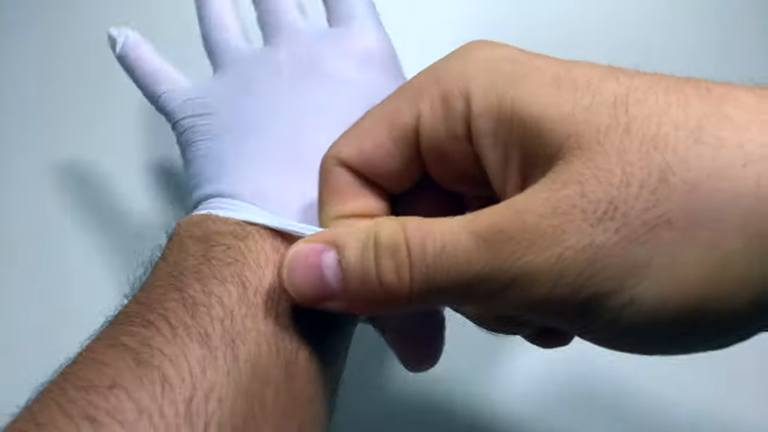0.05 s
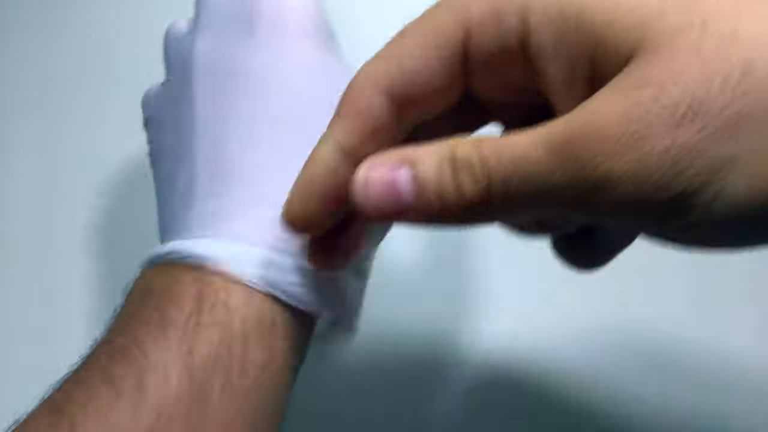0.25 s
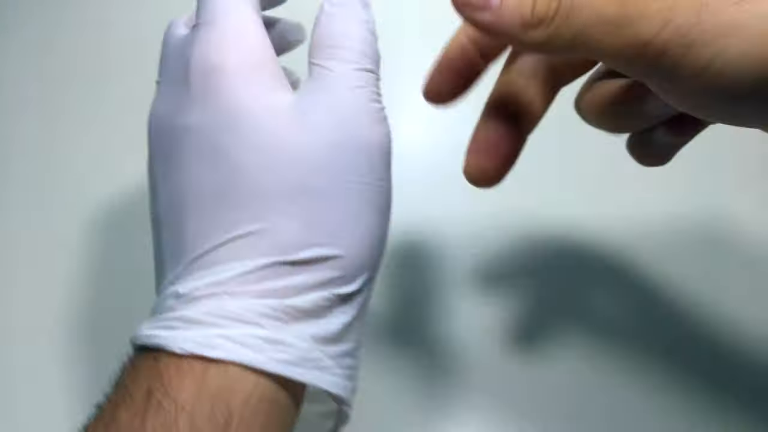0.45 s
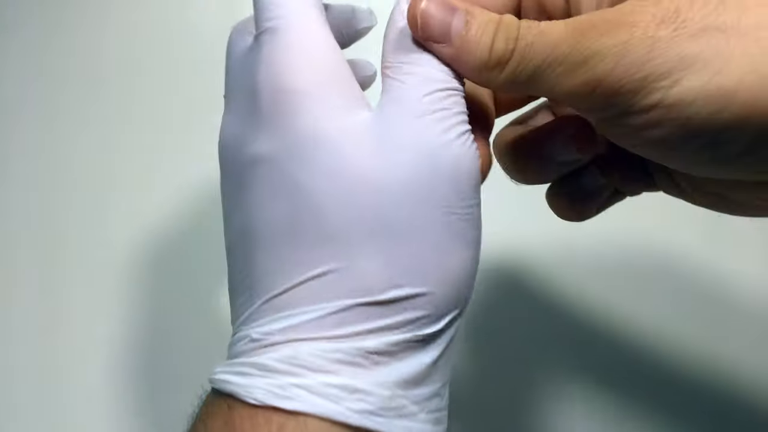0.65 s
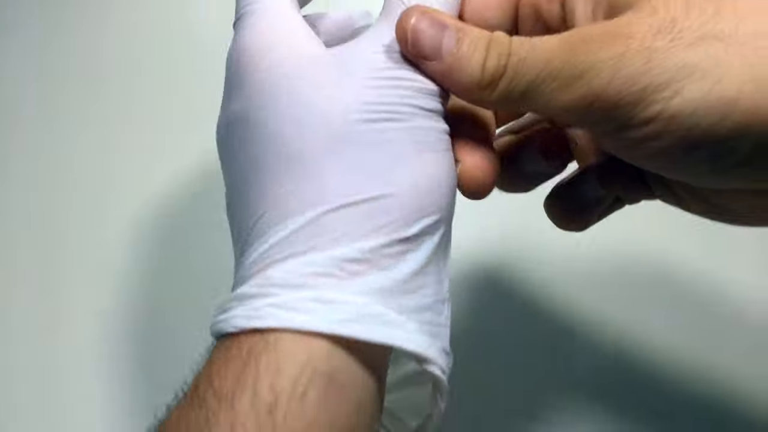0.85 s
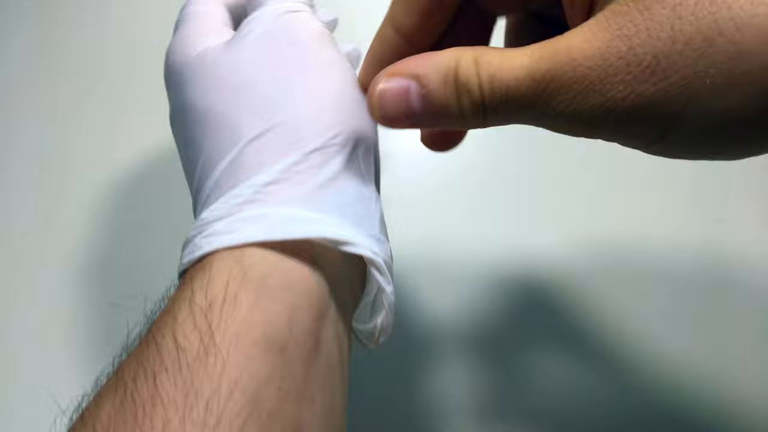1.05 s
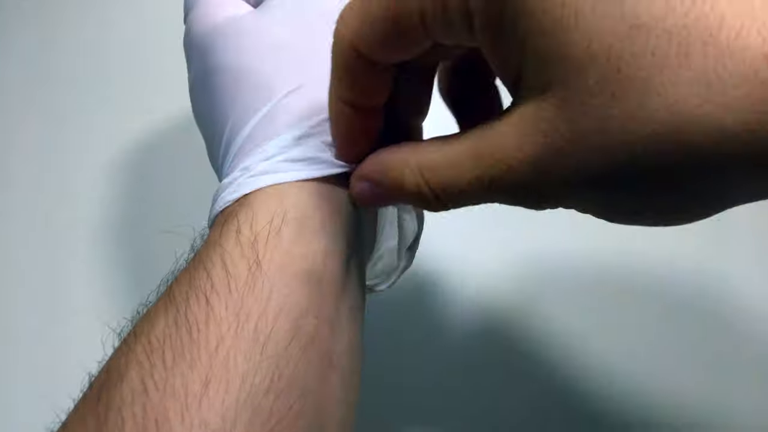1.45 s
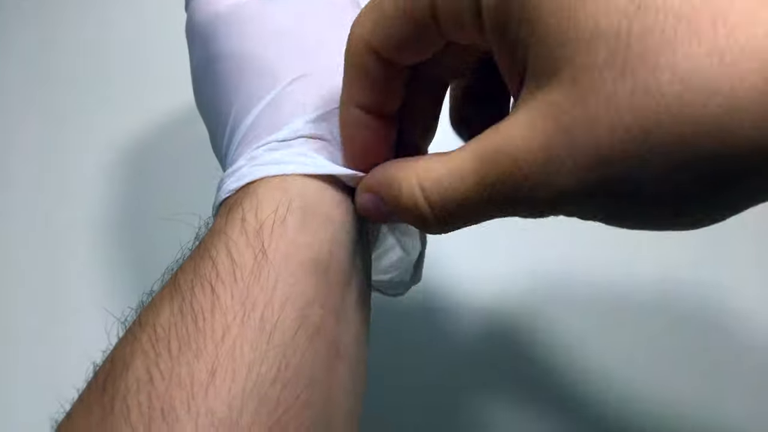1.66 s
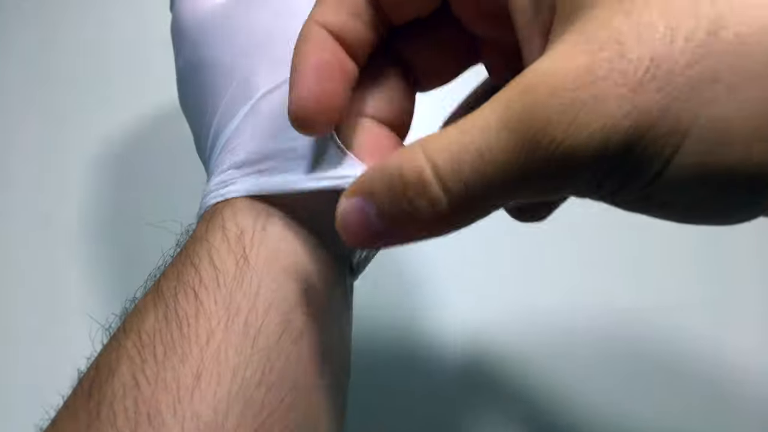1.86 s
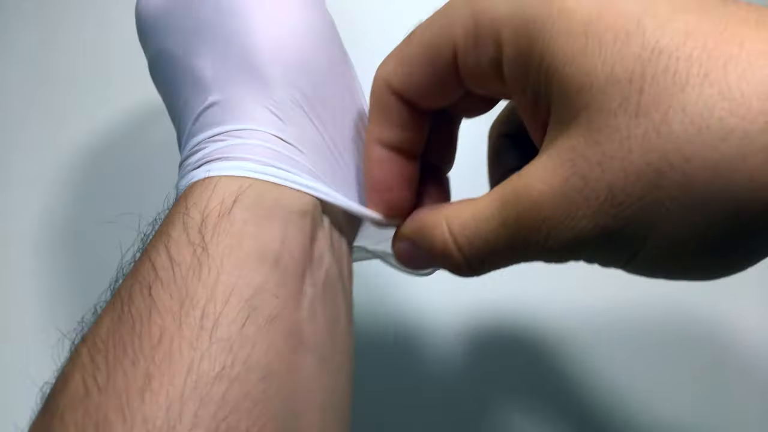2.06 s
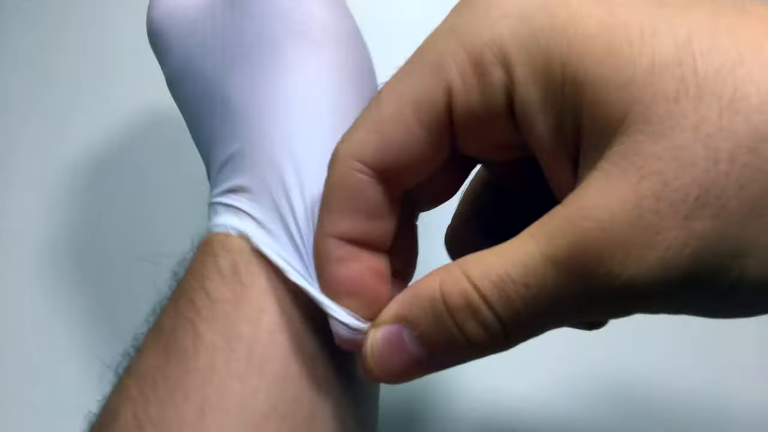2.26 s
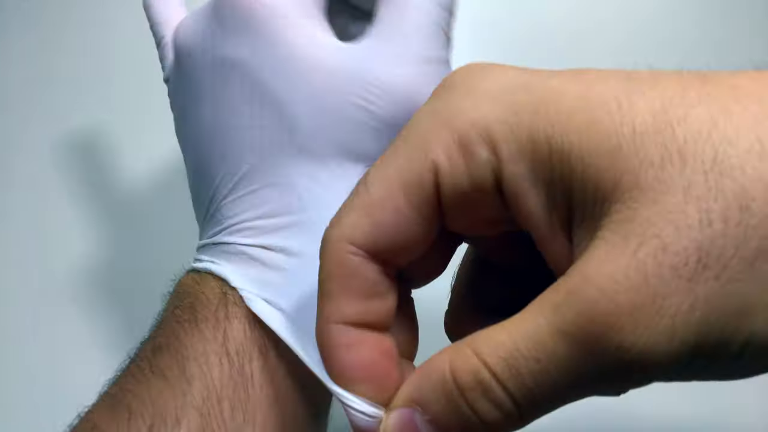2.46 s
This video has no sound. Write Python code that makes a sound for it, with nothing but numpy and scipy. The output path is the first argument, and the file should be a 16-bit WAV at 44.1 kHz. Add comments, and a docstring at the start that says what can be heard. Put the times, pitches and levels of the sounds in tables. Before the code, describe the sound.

Close up in a quiet room, a disposable glove cuff cracks against skin, and a loose fold slaps right after. Faint rustling and little clicks follow, then the rubber creaks and briefly groans as it is pulled taut.

```python
"""Faint rustles and small twangs of rubber, then the cuff of a thin glove snaps against the wrist,
close to one microphone in a small quiet room. The taut film cracks and slaps the skin; a loose fold
slaps after it. Fingers slide over the glove, take hold with a soft low boom and stretch the cuff again:
folds tick, and the rubber sticks and slips in twangs, creaks and a short groan. A low hum lies beneath."""
import sys
import numpy as np
from scipy import signal
from scipy.fft import rfft, irfft, next_fast_len
from scipy.io import wavfile
from scipy.ndimage import map_coordinates

SR = 44100
rng = np.random.default_rng(int(sys.argv[2]) if len(sys.argv) > 2 else 0)


def wrap_up_sound(samples):
    """Save the sound to the file named by the first command line argument, as 16-bit audio."""
    columns = np.atleast_2d(samples).T
    # keep every value between -1 and 1, then stretch to whole-number steps
    tamed = np.clip(columns, -1, 1)
    steps = np.round(tamed * 32767).astype(np.int16)
    wavfile.write(sys.argv[1], SR, steps)


N = 114660  # 2.6 s


def amp(db):
    """Decibels to gain."""
    return 10 ** (np.asarray(db) / 20)


def unit(x):
    """x scaled to rms 1."""
    return x / np.sqrt(np.mean(x ** 2) + 1e-20)


def along(points, hz):
    """(frequency, value) points read at hz on a log frequency axis."""
    freqs, values = np.transpose(points)
    return np.interp(np.log(hz + 1), np.log(freqs + 1), values)


def since(s):
    """Seconds after time s, for every sample."""
    return np.arange(N) / SR - s


def wobble(per_s):
    """A smooth random curve with per_s knots a second."""
    knots = rng.standard_normal(int(N * per_s / SR) + 4)
    return map_coordinates(knots, [np.arange(N) * per_s / SR])


def filtered(x, response):
    """x through a gain given as a function of frequency."""
    size = next_fast_len(N + SR // 2)
    return irfft(rfft(x, size) * response(np.fft.rfftfreq(size, 1 / SR)), size)[:N]


def coloured(x, spectrum):
    """x through a curve of (frequency [Hz], gain [dB]) points."""
    return filtered(x, lambda hz: amp(along(spectrum, hz)))


def resonant(x, ring_hz, q):
    """x through one resonance."""
    width = ring_hz / q
    return filtered(x, lambda f: 1j * f * width / (ring_hz ** 2 - f ** 2 + 1j * f * width))


def noise(spectrum):
    """Smooth noise of the given spectral shape, at rms 1."""
    return unit(coloured(rng.standard_normal(N), spectrum))


def bell(s, rise, fall):
    """A rounded swell that peaks at s."""
    t = since(s)
    return np.exp(-.5 * (t / np.where(t < 0, rise, fall)) ** 2)


def burst(s, rise, t60):
    """A quick rise to time s, then a decay of 60 dB in t60 seconds."""
    t = since(s)
    return np.exp(np.minimum(t, 0) / rise - np.log(1000) * np.maximum(t, 0) / t60)


def ring(s, modes, rise):
    """Damped modes (frequency [Hz], level [dB], t60 [s]) struck at s."""
    t = np.maximum(since(s), 0)
    tones = sum(amp(db) * np.exp(-np.log(1000) * t / t60) * np.sin(2 * np.pi * hz * t)
                for hz, db, t60 in modes)
    return tones * (1 - np.exp(-(t / rise) ** 2))


def struck(s, spectrum, pitch_ratio):
    """A single blow at s through a body of the given spectrum, shifted by pitch_ratio."""
    size = 8192
    hz = np.fft.rfftfreq(size, 1 / SR)
    cepstrum = irfft(np.log(amp(along(spectrum, hz / pitch_ratio))))
    causal = 1 + np.sign(np.fft.fftfreq(size))  # minimum phase: the energy comes at the start
    response = irfft(np.exp(rfft(cepstrum * causal)))
    return np.interp(since(s) * SR, np.arange(size), response, left=0, right=0)


# Room tone at the microphone (frequency [Hz], relative level [dB])
ROOM_TONE = [(20, -8), (50, -1), (260, -18.5), (400, -28), (1500, -31), (16000, -37)]
# A low murmur of air in the room (time [s], level [dB])
MURMUR_LEVELS = [(0, -69.5), (.45, -81.5), (.7, -67), (1.03, -71.5), (1.3, -79.5)]
# The murmur's spectrum (frequency [Hz], relative level [dB])
MURMUR_SPECTRUM = [(120, -9), (260, 5.5), (600, -16), (1500, -48)]


def background():
    """The quiet room: a wavering low hum, room tone and a murmur of air that swells and fades."""
    hum_hz, drift_rad = 46.8, .33
    hum = np.sqrt(2) * np.sin(2 * np.pi * hum_hz * since(0) + drift_rad * wobble(4.8))
    hum *= amp(-64.5 + 2 * wobble(5.5))
    murmur_db = np.interp(since(0), *np.transpose(MURMUR_LEVELS))
    return hum + amp(-67.5) * noise(ROOM_TONE) + amp(murmur_db) * noise(MURMUR_SPECTRUM)


# Decay of the small room (frequency [Hz], t60 [s])
ROOM_DECAY = [(200, .45), (15000, 0.4)]


def room(x):
    """The near walls return a diffuse tail that reaches the microphone just after the direct sound."""
    gap_s = .0076
    hz, t, frames = signal.stft(rng.standard_normal(SR // 2), SR, nperseg=256)
    decay = np.exp(-np.log(1000) * t / along(ROOM_DECAY, hz)[:, None])
    tail = signal.istft(frames * decay, SR, nperseg=256)[1]
    tail *= np.arange(len(tail)) / SR > gap_s
    return signal.fftconvolve(x, tail / np.linalg.norm(tail))[:N]


def boom():
    """A soft low boom as the hand takes hold: one damped mode."""
    hz, db, t60 = 59.2, -51, 1.0
    return ring(1.358, [(hz, db, t60)], rise=.015)


def wrinkles():
    """Single wrinkles flick under the fingers: sparse, very short bursts of noise, at rms 1."""
    flicks_per_s, t60 = 120, .0044
    flicks = (rng.random(N) < flicks_per_s / SR) * amp(rng.uniform(-2, 1.4, N))
    decay = np.exp(-np.log(1000) / (t60 * SR))
    envelope = signal.lfilter([1], [1, -decay], flicks)
    return unit(envelope * rng.standard_normal(N))


def friction(spectrum, flicks):
    """Tiny slips of uneven size and wrinkle flicks over a smooth rub, at rms 1."""
    slips_per_s, scatter_db, slip_share = 2500, 4, .55
    slips = (rng.random(N) < slips_per_s / SR) * rng.choice([-1, 1], N)
    slips = np.sqrt(slip_share) * unit(slips * amp(scatter_db * rng.standard_normal(N)))
    rub = np.sqrt(1 - slip_share) * rng.standard_normal(N)
    return unit(coloured(slips + rub + flicks, spectrum))


# Fingers sliding on the glove, close to the microphone
# (peak time [s], rise [s], fall [s], scrape level [dB], rustle level [dB], hiss level [dB])
FINGER_STROKES = [(.015, 0.053, 0.063, -71, -59.5, -64), (0.063, 0.037, 0.032, -60.5, -62.5, -68.5),
                  (0.184, 0.023, 0.044, -66.5, -61.5, -65.5), (0.317, 0.0075, 0.011, -63, -53, -53),
                  (.5, .15, 0.13, -73, -69.5, -71.5), (0.624, 0.024, 0.0071, -72, -70.5, -61.5),
                  (0.802, 0.019, 0.0066, -59.5, -60, -53.5), (.845, 0.027, 0.14, -69, -74.5, -80),
                  (.985, .03, 0.01, -68.5, -73.5, -60), (1.03, 0.035, 0.068, -80, -85, -72),
                  (1.547, 0.067, 0.022, -86, -77.5, -66.5), (1.667, 0.026, 0.086, -84.5, -73.5, -65.5),
                  (1.847, 0.026, 0.029, -67.5, -70, -68.5), (1.895, 0.0095, 0.01175, -73.5, -70, -66),
                  (1.953, 0.0056, 0.032, -88, -63, -57.5), (2.05, 0.029, 0.043, -74.5, -66.5, -65.5),
                  (2.17, 0.029, 0.027, -73, -70, -65.5), (2.235, .018, 0.022, -76, -66, -59),
                  (2.289, 0.025, 0.038, -61.5, -58.5, -48.5), (2.343, 0.018, 0.052, -56.5, -57, -59.5),
                  (2.507, 0.034, 0.039, -61, -64, -70), (2.6, 0.017, .02, -69.5, -61.5, -56)]
# Low, middle and high layers of the rubbing, each (frequency [Hz], relative level [dB])
SCRAPE_SPECTRUM = [(100, -11), (250, 2.5), (450, -1.5), (600, -2), (950, -2), (1700, -5), (3000, -16.5),
                   (8000, -41)]
RUSTLE_SPECTRUM = [(500, -30.5), (1500, -5.5), (2900, -0.5), (4800, -2.5), (6500, -3), (9000, -8.5),
                   (15000, -13)]
HISS_SPECTRUM = [(2000, -30), (6000, -4.5), (9000, -2.5), (11000, -1.5), (14000, 4), (16000, -1)]


def strokes():
    """Each slide swells and fades with a slight judder; a firm grip scrapes, a light touch hisses."""
    power = sum((amp([[scrape_db], [rustle_db], [hiss_db]]) * bell(s, rise, fall)) ** 2
                for s, rise, fall, scrape_db, rustle_db, hiss_db in FINGER_STROKES)
    flicks = amp(-10.5) * wrinkles()
    layers = [friction(shape, flicks) for shape in (SCRAPE_SPECTRUM, RUSTLE_SPECTRUM, HISS_SPECTRUM)]
    judder = amp(1.46 * wobble(180))
    return (np.sqrt(power) * layers).sum(axis=0) * judder


# Stretched rubber creaking at the wrist (peak time [s], rise and fall [s], ring [Hz], level [dB])
RUBBER_CREAKS = [(0.096, 0.029, 1110, -57), (1.97, 0.012, 644, -64.5), (2.395, 0.017, 121, -54.5)]


def creaks():
    """The rubber sticks and slips unevenly, and each slip rings the stretched film."""
    slips_per_s, jitter = 420, .35
    out = np.zeros(N)
    for s, width, ring_hz, db in RUBBER_CREAKS:
        slip_rate = slips_per_s * np.exp(jitter * wobble(400))
        slip_count = np.floor(np.cumsum(slip_rate) / SR)
        slips = np.diff(slip_count, prepend=0) * rng.standard_normal(N)
        swell = bell(s, width, width)
        creak = unit(swell * resonant(slips, ring_hz, q=5.2))
        out += amp(db) * creak * np.sqrt(np.mean(swell ** 2))
    return out


# The cuff groaning at full stretch (time [s], pitch [Hz], level [dB])
GROAN_PATH = [(2.3, 600.6, -83), (2.327, 531.3, -53), (2.4, 346.5, -59.5), (2.42, 330, -78)]


def groan():
    """The slips fall into step: a short, shaky, sinking tone of four harmonics."""
    jitter, db_per_harmonic, shake_db = .07, -8, 2.5
    times, hz, db = np.transpose(GROAN_PATH)
    pitch = np.interp(since(0), times, hz) * np.exp(jitter * wobble(300))
    phase = 2 * np.pi * np.cumsum(pitch) / SR
    tone = unit(sum(amp(db_per_harmonic * k) * np.sin((k + 1) * phase) for k in range(4)))
    envelope = np.interp(since(0), times, amp(db), left=0, right=0)
    return envelope * amp(shake_db * wobble(250)) * tone


# Folds popping and fingertips letting go, close up
# (time [s], rise [s], t60 [s], pop pitch [Hz], pop level [dB], thud level [dB], tick level [dB])
FOLD_CLICKS = [(0.7596, 0.0023, .011, 14500, -42.5, -63.5, -53),
               (0.7731, .001, 0.0068, 2600, -54, -60.5, -55),
               (1.842, 0.0029, .012, 3400, -48.5, -53.5, -39), (1.844, 0.0025, 0.029, 303, -49, -63, -76),
               (2.2455, 0.00036, 0.006, 9700, -39, -75, -48)]
# Dull and bright parts of a click, each (frequency [Hz], relative level [dB])
THUD_SPECTRUM = [(60, -22), (200, 2), (700, -2), (4000, -55)]
TICK_SPECTRUM = [(500, -33), (3000, -1), (10000, -7.5), (15000, -1.5)]


def clicks():
    """Dead little clicks: a fold pops at a pitch set by its size, with a soft thud and a bright tick."""
    thud, tick = noise(THUD_SPECTRUM), noise(TICK_SPECTRUM)
    out = np.zeros(N)
    for s, rise, t60, pop_hz, pop_db, thud_db, tick_db in FOLD_CLICKS:
        pop = unit(resonant(rng.standard_normal(N), pop_hz, q=2.2))
        out += burst(s, rise, t60) * (amp(pop_db) * pop + amp(thud_db) * thud + amp(tick_db) * tick)
    return out


# Single slips and taps on the rubber, close up (time [s], pitch [Hz], ring level [dB], scuff level [dB])
FILM_TWANGS = [(.0635, 2580, -36, -54), (0.1019, 1080, -46, -69), (0.1396, 1020, -44, -64),
               (0.1572, 1680, -32.5, -57), (0.1634, 1500, -36, -59), (0.1941, 1080, -37.5, -56),
               (0.9499, 870, -41.5, -44.5), (2.315, 525, -45.5, -53), (2.3423, 1010, -47, -53),
               (2.3891, 478, -36, -43.5), (2.403, 376, -38.5, -46), (2.4299, 355, -37.5, -51),
               (2.433, 750, -36.5, -42.5)]
# The scuff of each one (frequency [Hz], relative level [dB])
SCUFF_SPECTRUM = [(100, -4.5), (1500, 2.5), (16000, -24.5)]


def twangs():
    """Each slip or tap scuffs the film and rings two of its modes for a few cycles."""
    decay_cycles, overtone_ratio, overtone_db = 8, 1.8, -6
    scuff = noise(SCUFF_SPECTRUM)
    out = np.zeros(N)
    for s, hz, ring_db, scuff_db in FILM_TWANGS:
        t60 = decay_cycles / hz
        modes = [(hz, 0, t60), (hz * overtone_ratio, overtone_db, t60 / overtone_ratio)]
        out += amp(ring_db) * ring(s, modes, rise=.0003)
        out += amp(scuff_db) * burst(s, rise=.00055, t60=.011) * scuff
    return out


# The cuff, then a loose fold, hitting the wrist close to the microphone
# (time [s], crack level [dB], slap level [dB], slap pitch [ratio], pocket level [dB], sizzle level [dB])
CUFF_SNAPS = [(0.2202, -6, 5, 1, -13, -33.5), (0.2823, -21.5, -8, 1.15, -37, -31.5)]
# Modes of the taut film and of the air trapped under it (frequency [Hz], relative level [dB], t60 [s])
CRACK_MODES = [(5800, -8.5, .003), (6650, 3.5, 0.0023), (8670, -9, 0.0035), (13700, -13, 0.00235),
               (14600, -15.5, .0035)]
POCKET_MODES = [(2620, 0, .0062)]
# The hollow slap on skin and the film's flutter, each (frequency [Hz], relative level [dB])
SLAP_SPECTRUM = [(150, -23), (400, -21), (560, -31), (690, -2.5), (790, -7.5), (890, 1), (1020, -6.5),
                 (1180, 1), (1520, -5.5), (1850, -26), (4000, -50)]
FLUTTER_SPECTRUM = [(130, -10), (260, -6), (500, -12.5), (800, 0.5), (1300, 1), (2000, -6), (4000, -7),
                    (6700, -5), (9000, -11), (15000, -9)]


def snaps():
    """The film whips through the air, cracks, slaps the skin over a pocket of air and shivers briefly."""
    crack_rise_s, slap_lag_s, flutter_t60_s = .00016, .00039, .044
    lowcut = signal.butter(2, 3600, "highpass", fs=SR, output="sos")
    out = np.zeros(N)
    for s, crack_db, slap_db, pitch_ratio, pocket_db, sizzle_db in CUFF_SNAPS:
        crack = amp(crack_db) * signal.sosfilt(lowcut, ring(s, CRACK_MODES, crack_rise_s))
        slap = amp(slap_db) * struck(s + slap_lag_s, SLAP_SPECTRUM, pitch_ratio)
        pocket = amp(pocket_db) * ring(s, POCKET_MODES, rise=.0007)
        sizzle = amp(sizzle_db) * burst(s, rise=.0003, t60=.005) * noise(HISS_SPECTRUM)
        whip = amp(-42) * burst(s, rise=.0027, t60=flutter_t60_s)  # swells just before the landing
        shiver = amp(-28) * burst(s, crack_rise_s, flutter_t60_s)
        flutter = amp(crack_db) * (whip + shiver) * noise(FLUTTER_SPECTRUM)
        out += crack + slap + pocket + sizzle + flutter
    return out


# Colour of the snaps as the room returns them (frequency [Hz], gain [dB])
SNAP_ECHO_COLOUR = [(1100, 0), (4000, -1), (6700, -4.5), (9000, 0)]


def scene():
    """One microphone near the wrist: the glove up close, the room's tail and background behind it."""
    room_db = -11
    cuff = snaps()
    handling = clicks() + twangs() + strokes() + creaks() + groan()
    echo = amp(room_db) * (room(coloured(cuff, SNAP_ECHO_COLOUR)) + room(handling))
    return (cuff + handling + echo + boom() + background())[None]


def record(dry):
    """Nothing is kept above the band limit."""
    top_hz = 16050
    return np.array([filtered(channel, lambda hz: hz < top_hz) for channel in dry])


dry = scene()
out = record(dry)
wrap_up_sound(out)
```